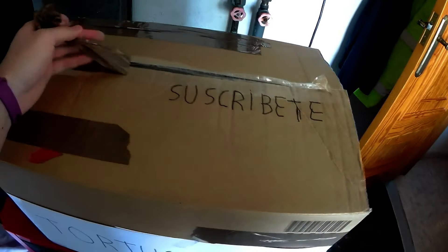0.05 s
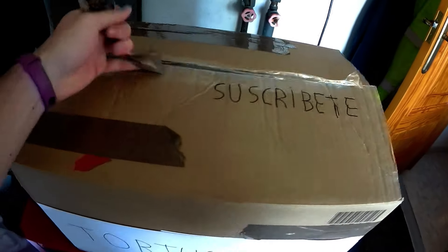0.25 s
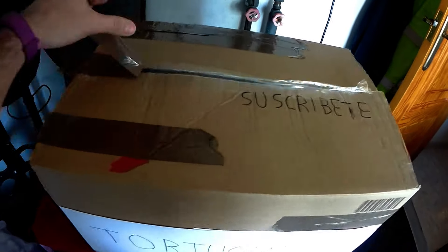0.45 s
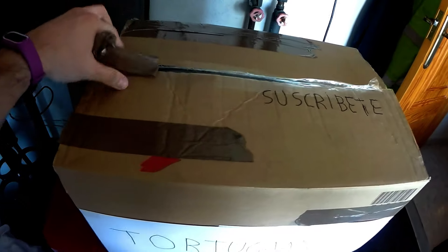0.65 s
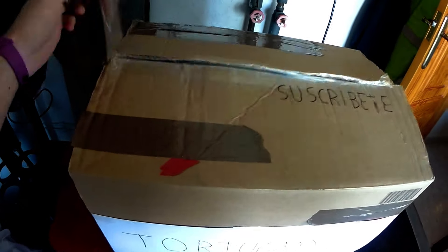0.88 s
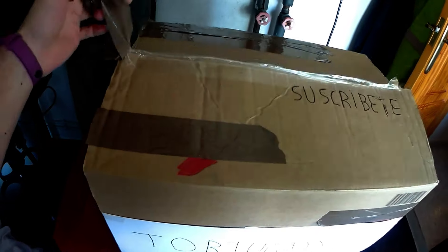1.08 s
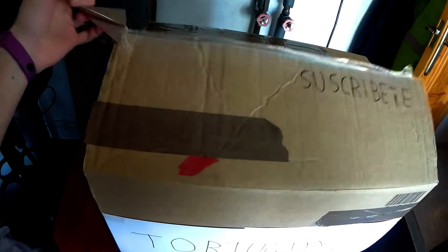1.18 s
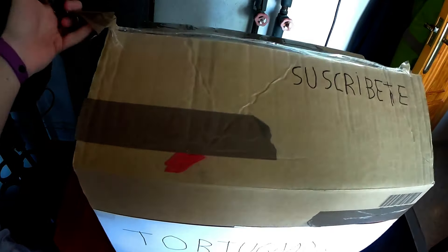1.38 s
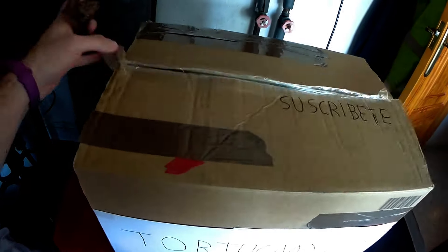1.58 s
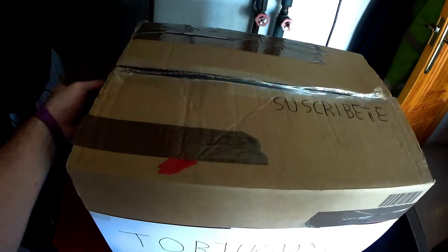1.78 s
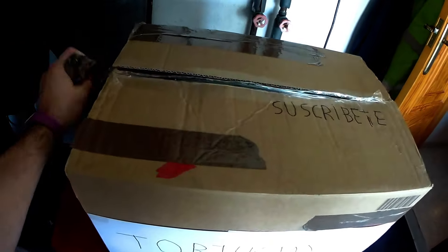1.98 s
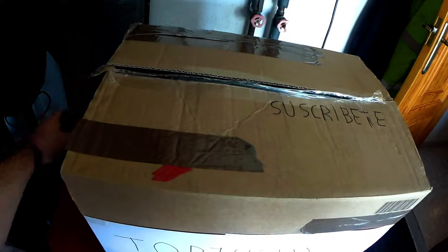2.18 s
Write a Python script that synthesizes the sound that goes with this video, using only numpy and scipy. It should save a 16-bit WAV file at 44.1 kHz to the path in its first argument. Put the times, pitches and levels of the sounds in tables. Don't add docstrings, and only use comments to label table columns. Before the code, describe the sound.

Packing tape ripped by hand off a cardboard box in short crackling tears, close up indoors

```python
import sys
import numpy as np
from scipy import signal
from scipy.io import wavfile
from scipy.ndimage import uniform_filter1d, minimum_filter1d

SR = 44100
rng = np.random.default_rng(int(sys.argv[2]) if len(sys.argv) > 2 else 0)


def volts_from_decibels(level):
    exponent = np.asarray(level, float) / 20
    return 10 ** exponent


def inscribe(sig):
    pcm = np.round(np.clip(np.atleast_2d(sig).T, -1, 1) * 32767)
    wavfile.write(sys.argv[1], SR, pcm.astype(np.int16))


N = 99225

# frequency in Hz, level in dB.
FLOOR_SPECTRUM = [(20, -11), (65, -10.5), (130, -20), (600, -11.5), (2800, -16), (4000, -18),
                  (11000, -33.5)]
# low edge in Hz, high edge in Hz, level re mid in dB, share of time present [0-1].
PORT_BANDS = [(1950, 2900, -19, .8), (3450, 4200, -17, .5), (6900, 8300, -13, .6)]
# time in seconds, peak in dB, frequency in Hz.
SHOVES = [(0.207, -17, 74), (0.597, -18, 67), (0.645, -25, 75), (0.754, -17, 67), (0.849, -21, 89),
          (1.217, -25, 68), (1.441, -26, 57.4), (1.655, -12, 84), (1.76, -17.5, 67), (1.899, -18.5, 70),
          (2.03, -23, 74)]
# time in seconds, peak in dB, frequency in Hz.
WALL_BOOMS = [(0.22, -20, 304), (0.238, -20, 221), (0.263, -11, 262), (0.602, -30.5, 160),
              (0.811, -16, 198), (0.847, -17, 216), (1.236, -18.5, 214), (1.445, -11, 217),
              (1.72, -24, 215), (1.78, -34, 220), (1.569, -26.5, 228), (1.609, -27.5, 205),
              (1.674, -10.5, 226.5), (1.85, -23.5, 202), (1.923, -17.5, 235), (1.985, -17, 221)]
# time in seconds, peak in dB, frequency in Hz.
LOW_WALL_RINGS = [(0.203, -7, 650), (0.254, -12, 600), (0.759, -24, 600), (0.8, -22, 600),
                  (1.955, -14, 640), (0.283, -13.5, 257), (0.217, -15, 640), (0.24, -9, 640),
                  (1.868, -8.5, 635), (1.883, -11, 625), (1.938, -9.5, 634)]
# time in seconds, peak in dB, frequency in Hz.
HIGH_WALL_RINGS = [
    (0.2084, -1.5, 1450),
    (0.22, -3.5, 1464),
    (0.2526, -8, 1417),
    (0.21, -39, 965),
    (0.262, -9, 1155),
    (0.7599, -6, 1458),
    (0.848, -10, 1437),
    (1.6752, -6, 1462),
    (1.715, -22.5, 1450),
    (1.85, -9.5, 1450),
]
# frequency in Hz, width in Hz, level in dB.
BOX_MODES = [(216, 77, -16), (262, 11.4, -11), (362.5, 60, -14), (640, 13.4, -7), (965, 7.3, -17),
             (1168, 28, -20), (1297, 180, -8), (1450, 45, -8), (2233, 150, -12.5), (2420, 190, -16),
             (2754, 570, -3.5)]
# time in seconds, peak in dB, card ring in Hz.
CARD_SNAPS = [(0.023, -21.5, 2930), (0.054, -26, 2540), (0.065, -23, 2400), (0.095, -19.5, 1420),
              (0.1, -22.5, 1090), (0.114, -20, 2450), (0.124, -21, 2610), (0.158, -13.5, 2400),
              (0.186, -14, 2670), (0.195, -13, 1450), (0.384, -23, 2380), (0.396, -24, 1320),
              (0.428, -20, 2500), (0.626, -25, 1430), (0.634, -13.5, 2770), (0.653, -12.5, 1180),
              (0.692, -14.5, 2540), (0.909, -9, 2140), (0.919, -10.5, 1420), (0.995, -32, 1500),
              (1.045, -21, 1570), (1.061, -20.5, 1300), (1.094, -11.5, 1500), (1.101, -12.5, 1400),
              (1.147, -13.5, 2080), (1.173, -19, 2660), (1.185, -16, 2170), (1.197, -15, 1140),
              (1.202, -9, 1150), (1.214, -6.5, 2660), (1.232, -15, 2400), (1.265, -20, 1490),
              (1.297, -11.5, 2030), (1.444, -11.5, 1540), (1.451, -18, 1520), (1.48, -10.5, 1010),
              (1.483, -22, 960), (1.556, -18.5, 1940), (1.566, -19, 1450), (1.642, -16, 2100),
              (1.66, -13, 1250), (1.686, -8, 1450), (1.728, -11, 1450), (1.816, -34, 2920),
              (2.051, -18, 2860), (2.081, -21, 2150), (2.109, -16, 2490), (2.128, -13, 2270),
              (2.153, -16.5, 2470), (2.201, -20, 2300), (2.215, -32, 2330), (2.228, -20, 2350),
              (1.047, -17.5, 2800),
    (1.4793, -20.5, 2900),
    (1.4842, -13.5, 2880),
    (1.661, -12, 3170),
    (1.6863, -18, 3010),
]
# time in seconds, peak in dB, ring in Hz.
TAPE_TICKS = [(0.0247, -19, 7360), (0.0554, -31, 7200), (0.0655, -23, 5430), (0.0865, -25, 4710),
              (0.096, -27, 7640), (0.101, -19, 6700), (0.1227, -20, 5470), (0.158, -20, 5190),
              (0.1947, -15, 7700), (0.3661, -24, 4780), (0.3969, -14, 7000), (0.422, -19, 6620),
              (0.4928, -32, 7300), (0.51, -24, 5600), (0.7633, -16, 6600), (0.91, -9, 5230),
              (0.9188, -33, 7200), (0.995, -38, 7700), (1.0923, -12, 4800), (1.1392, -16, 5210),
              (1.1459, -14.5, 6200), (1.173, -23, 4660), (1.1825, -18, 5110), (1.2042, -13, 4600),
              (1.2152, -8.5, 6800), (1.222, -10.5, 7060), (1.232, -7, 6970), (1.265, -6.5, 7060),
              (1.301, -14, 7300), (1.5552, -18, 7350), (1.6401, -24, 7210), (1.8163, -21, 6800),
              (2.0506, -26, 7700), (2.0736, -20, 6900), (2.0817, -25, 6400), (2.1296, -13.5, 7140),
              (2.2156, -25, 7470)]
# time in seconds, level in dB, tape brightness in dB.
HANDLING = [(0.008, -32.5, -4), (.02, -37, -7), (.16, -31.5, -6), (0.432, -32.5, -6.5), (0.463, -46, -4),
            (.6, -33.5, -24), (.62, -33.5, -8), (.95, -38.5, -2), (1.02, -35, -2.5), (1.3, -38, -1),
            (1.37, -37.5, -6), (1.44, -32.5, -13), (1.53, -38.5, -11), (1.56, -32.5, -9.5),
            (1.83, -33.5, -3.5), (2.04, -36, -4.5), (2.101, -33.5, -3), (2.25, -41, 1.5)]
TAPE_ZONES_HZ = [2500, 5700, 8600, 11600]
# frequency in Hz, level in dB.
CARD_SPECTRUM = [(90, -40.5), (160, 1.5), (500, -7), (1000, -7.5), (2800, -3.5), (3500, -23.5), (5000, -16),
                 (9000, -79.5)]
# frequency in Hz, level in dB.
TAPE_SPECTRUM = [(1760, -37.5), (3000, 1), (4050, -10), (4630, -3), (7480, 0), (8800, -11.5), (11000, -13),
                 (14300, -125), (22000, -120)]
# start in seconds, length in seconds, grip in ms, pull in dB, tape brightness in dB.
TEARS = [(0.168, 0.07, 24, -28.5, 5.5), (.2015, 0.035, 0.41, -8.5, -6), (0.244, 0.0043, 1, -29, 5),
         (0.25, 0.017, 0.5, -7.5, -9), (0.274, 0.057, 3.9, -23, -5), (0.61, 0.078, 5.3, -36, -4),
         (0.711, 0.063, 22.3, -20, 1), (0.75, 0.013, 13.3, -11, 3), (0.772, 0.045, 7.1, -19, -0.5),
         (0.821, 0.072, 5.2, -26.5, -1.5), (0.899, 0.043, 0.8, -32, 3.5), (1.181, 0.024, 2, -30, -3),
         (1.199, 0.025, 1.8, -22.5, -8), (1.22, 0.026, 1.7, -27.5, 0), (1.248, 0.071, 11, -33, 4),
         (1.439, 0.013, 4, -20.5, -10), (1.471, 0.0094, 2, -27.5, -23), (1.48, 0.016, 3.4, -24.5, -13.5),
         (1.653, 0.02, 4.4, -18.5, -11), (1.667, 0.026, 3.8, -22.5, -7.5), (1.699, 0.053, 2.6, -27.5, -6.5),
         (1.843, 0.031, 1.6, -19.5, 0), (1.878, 0.058, 4.5, -21, -3.5), (1.922, 0.046, 26, -16, -5),
         (1.966, 0.032, 2.2, -24, -8)]

FLOOR_DB = -39
ROOM_T60_S, ROOM_DB, ROOM_DULL, PORT_T60_S = 0.42, -12, 0.55, 0.05
WALL_CUT_HZ, ROOM_CUT_HZ, TAPE_WET = 125, 353, 0.25
BOOM_S, RING_S, WAVER = 0.01, 0.0055, 0.04
SNAP_S, SNAP_WIDTH_HZ, SNAP_DB = 0.0012, 750, -3
TICK_S, TICK_WIDTH_HZ, TICK_DB = 0.001, 2200, -2
CRINKLES_PER_S, CRINKLE_SPREAD_DB, CRINKLE_S, TAPE_RUSTLE = 400, 3.6, 0.001, 0.15
CLICKS_PER_S, SPREAD_DB, FUZZ, CLUMP_DB = 5000, 1, 0.72, 1.8
LET_GO_S, SAG_DB = 0.0061, -5.5
CEILING, EDGE_HZ = 0.9, 11250
HOLE_UNDER_DB, HOLE_DB, HOLE_FROM_HZ = 9, -14, 2800


def evened(x):
    return x / np.sqrt(np.mean(x ** 2) + 1e-20)


def read(points, hz):
    f, value = np.transpose(points)
    return np.interp(np.log(hz + 1), np.log(f + 1), value)


def add(mix, s, sound):
    part = mix[max(round(s * SR), 0):][:len(sound)]
    part += sound[:len(part)]


def colour(x, points):
    db = np.maximum(read(points, np.abs(np.fft.fftfreq(4096, 1 / SR))), -100)
    response = np.exp(np.conj(signal.hilbert(np.log(volts_from_decibels(db)))))
    taps = np.fft.ifft(response).real[:2048]
    return signal.oaconvolve(x, taps / np.linalg.norm(taps))[:len(x)]


def resonate(x, hz, width_hz):
    r = np.exp(-np.pi * width_hz / SR)
    angle = 2 * np.pi * hz / SR
    return 2 * np.sqrt(1 - r) * signal.lfilter([np.sin(angle)], [1, -2 * r * np.cos(angle), r * r], x)


def high_pass(x, hz):
    return signal.sosfilt(signal.butter(4, hz, "high", fs=SR, output="sos"), x)


def band_pass(x, band_hz):
    return signal.sosfilt(signal.butter(2, band_hz, "band", fs=SR, output="sos"), x)


def clicks(per_s, spread_db):
    size = volts_from_decibels(spread_db * np.minimum(rng.exponential(1, N), 4))
    return size * rng.choice([-1., 1.], N) * (rng.random(N) < per_s / SR)


def floor_noise():
    return volts_from_decibels(FLOOR_DB) * colour(rng.standard_normal(N), FLOOR_SPECTRUM)


def room(x, t60_s, start):
    taps = np.zeros(SR // 2)
    at = np.arange(start, SR // 2 - 22, 22)
    taps[at + rng.integers(0, 22, len(at))] = rng.choice([-1., 1.], len(at))
    taps = signal.lfilter([1], [1, -ROOM_DULL], taps)
    taps *= volts_from_decibels(-60 * np.arange(len(taps)) / SR / t60_s)
    return signal.oaconvolve(x, taps / np.linalg.norm(taps))[:N]


def ports(mid):
    hz, t, z = signal.stft(room(mid, PORT_T60_S, start=2), SR, nperseg=1024)
    keep = np.zeros(z.shape)
    draws = rng.random((len(PORT_BANDS), len(t) // 4 + 1))
    for (low, high, db, share), luck in zip(PORT_BANDS, draws):
        present = np.repeat(luck < share, 4)[:len(t)]
        keep += volts_from_decibels(db) * ((hz > low) & (hz < high))[:, None] * present
    return signal.istft(z * keep, SR, nperseg=1024)[1][:N]


def flexes(table, swell_s, wobble, gain_db):
    t, out = np.arange(round(.3 * SR)) / SR, np.zeros(N)
    shape = (t / swell_s * np.exp(1 - t / swell_s)) ** 2
    for (s, db, hz), drift in zip(table, rng.standard_normal((len(table), len(t)))):
        bend = 1 + wobble * evened(uniform_filter1d(drift, size=300))
        phase = 2 * np.pi * np.cumsum(hz * bend) / SR
        add(out, s - swell_s / 2, volts_from_decibels(db + gain_db) * shape * np.sin(phase))
    return out


def shoving(pull, crease):
    thumps = flexes(SHOVES, swell_s=0.025, wobble=0.25, gain_db=-15.5)
    rumble = resonate(resonate(0.47 * pull + crease, 64, 66), 64, 66) / 30
    return thumps + volts_from_decibels(-16) * rumble


def flexing_walls():
    booms = flexes(WALL_BOOMS, swell_s=BOOM_S, wobble=WAVER, gain_db=-1.0)
    low = flexes(LOW_WALL_RINGS, swell_s=RING_S, wobble=WAVER / 2, gain_db=-3.5)
    high = flexes(HIGH_WALL_RINGS, swell_s=0.00632, wobble=0.025, gain_db=-5.5)
    return booms + low + high


def box_ringing(drive):
    return sum(volts_from_decibels(db - 4.5) * resonate(drive, hz, width_hz) for hz, width_hz, db in BOX_MODES)


def snaps(table, decay_s, width_hz, gain_db):
    t, out = np.arange(700) / SR, np.zeros(N)
    shape = (1 - np.exp(-t / .0003)) * np.exp(-t / decay_s)
    for (s, db, hz), grit in zip(table, rng.standard_normal((len(table), len(t))) * shape):
        ring = resonate(resonate(grit, hz, width_hz), hz, width_hz)
        add(out, s, volts_from_decibels(db + gain_db) * ring / abs(ring).max())
    return out


def crinkling():
    t, n = np.arange(N) / SR, np.arange(600)
    s, db, tape_db = np.transpose(HANDLING)
    puff = (1 - np.exp(-n / 6)) * np.exp(-n / SR / CRINKLE_S)

    def puffs():
        grains = abs(clicks(CRINKLES_PER_S, CRINKLE_SPREAD_DB))
        return evened(signal.oaconvolve(grains, puff)[:N])

    shared, low, *own = [puffs() for _ in range(5)]
    card = evened((shared + 3.0 * low + 1.15) * rng.standard_normal(N))
    tape = np.zeros(N)
    for zone_hz, mine in zip(zip(TAPE_ZONES_HZ, TAPE_ZONES_HZ[1:]), own):
        tape += band_pass((shared / 2 + mine + TAPE_RUSTLE) * rng.standard_normal(N), zone_hz)
    return volts_from_decibels(np.interp(t, s, db)) * card, volts_from_decibels(np.interp(t, s, db + tape_db)) * evened(tape)


def peeling():
    t, pull, bright = np.arange(N) / SR, np.zeros(N), np.zeros(N)
    for s, length_s, grip_ms, db, tape_db in TEARS:
        grip = np.clip((t - s) / (grip_ms / 1000), 0, 1) ** 2
        sag = volts_from_decibels(SAG_DB * np.clip((t - s) / length_s, 0, 1))
        shape = grip * sag * np.exp(-np.maximum(t - s - length_s, 0) / LET_GO_S)
        pull += volts_from_decibels(db) * shape
        bright += volts_from_decibels(db + tape_db) * shape

    def slow_noise():
        return evened(uniform_filter1d(uniform_filter1d(rng.standard_normal(N), size=120), size=60))

    def fibres(own):
        grit = evened(clicks(CLICKS_PER_S, SPREAD_DB)) + FUZZ * rng.standard_normal(N)
        return evened(volts_from_decibels(CLUMP_DB * (shared + 0.24 * own)) * grit)

    shared = slow_noise()
    return pull * fibres(slow_noise()), bright * fibres(slow_noise())


def scene():
    pull, bright = peeling()
    crease, rustle = crinkling()
    snap = snaps(CARD_SNAPS, SNAP_S, SNAP_WIDTH_HZ, SNAP_DB)
    tick = snaps(TAPE_TICKS, TICK_S, TICK_WIDTH_HZ, TICK_DB)
    box = box_ringing(pull + .5 * crease)
    card = volts_from_decibels(-3) * colour(pull + crease, CARD_SPECTRUM)
    near = high_pass(card + box + snap, WALL_CUT_HZ)
    tape = colour(bright + rustle, TAPE_SPECTRUM) + tick
    wet = volts_from_decibels(ROOM_DB) * room(high_pass(near, ROOM_CUT_HZ) + TAPE_WET * tape, ROOM_T60_S, start=200)
    mid = near + flexing_walls() + tape + wet + shoving(pull, crease) + floor_noise()
    side = ports(mid)
    return np.array([mid + side, mid - side])


def thin_treble(x):
    hz, _, z = signal.stft(x, SR, nperseg=256)
    db = 10 * np.log10(uniform_filter1d(abs(z.mean(0)) ** 2, size=5, axis=0) + 1e-14)
    steady = uniform_filter1d(db, size=2, axis=1)
    coming = -minimum_filter1d(-steady, size=5, axis=1, origin=-2)
    hole = (db < coming - HOLE_UNDER_DB) & (hz > HOLE_FROM_HZ)[:, None]
    return signal.istft(z * volts_from_decibels(HOLE_DB * hole), SR, nperseg=256)[1][:, :N]


def top_cut(x):
    return signal.sosfilt(signal.butter(12, 12350, fs=SR, output="sos"), x)


def record(dry):
    held = dry / (1 + (dry.mean(0) / CEILING) ** 4) ** (1 / 4)
    low_pass = signal.firwin(511, EDGE_HZ, window=("kaiser", 9), fs=SR)
    cut = signal.oaconvolve(thin_treble(held), low_pass[None], "same")
    return top_cut(cut)


dry = scene()
out = record(dry)
inscribe(out)
```